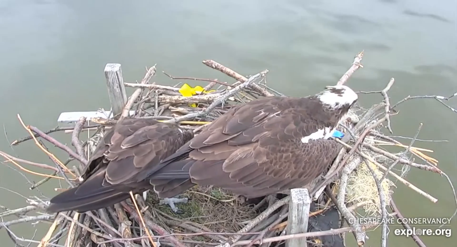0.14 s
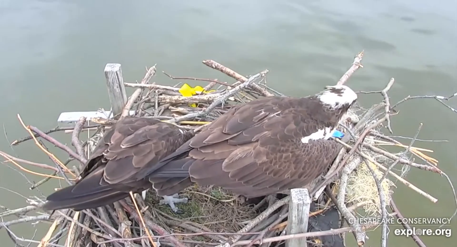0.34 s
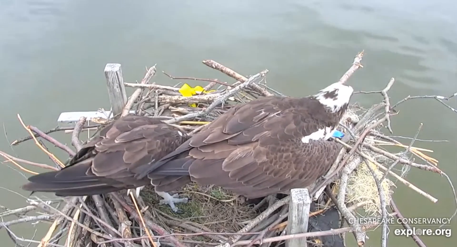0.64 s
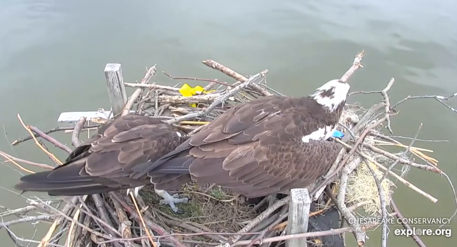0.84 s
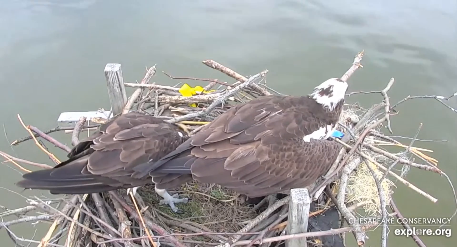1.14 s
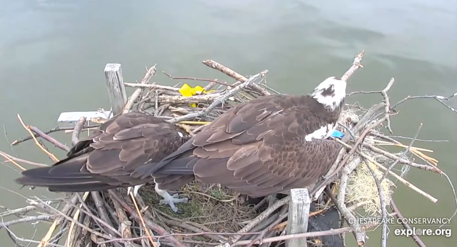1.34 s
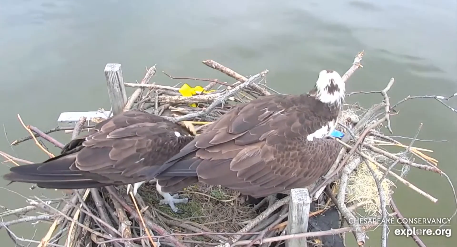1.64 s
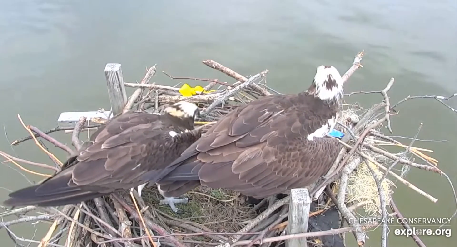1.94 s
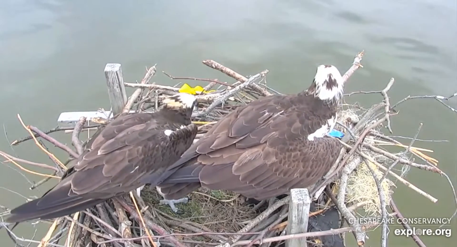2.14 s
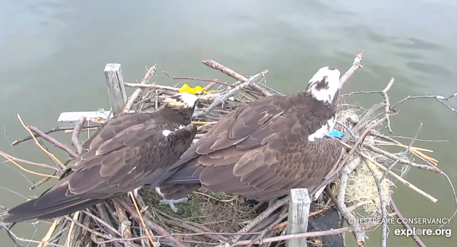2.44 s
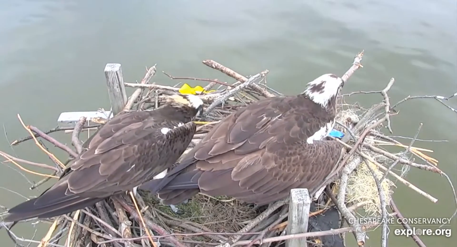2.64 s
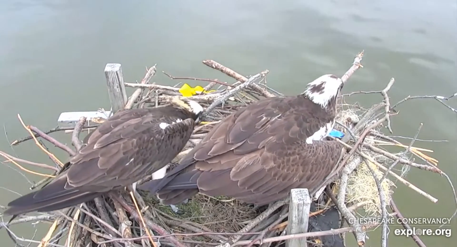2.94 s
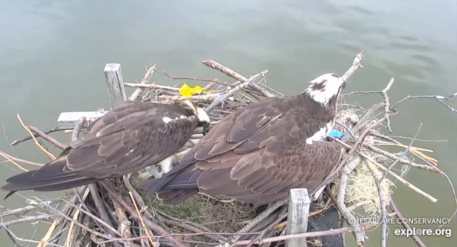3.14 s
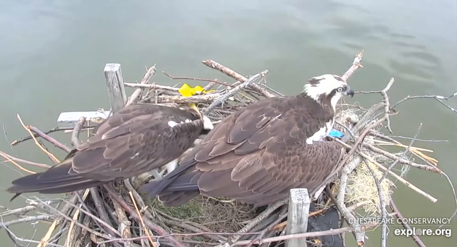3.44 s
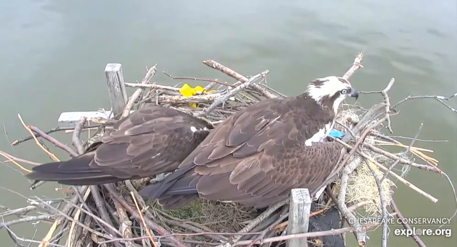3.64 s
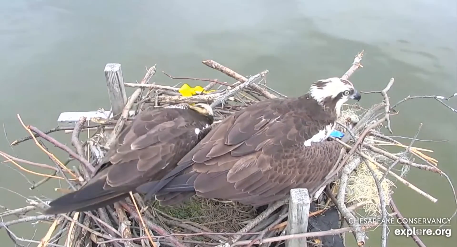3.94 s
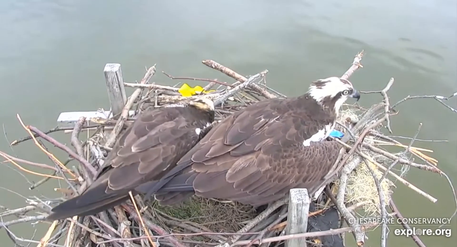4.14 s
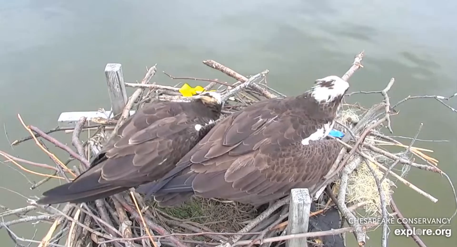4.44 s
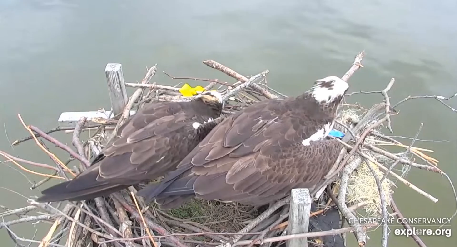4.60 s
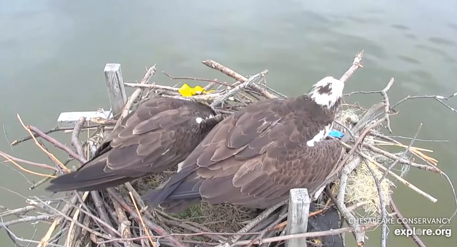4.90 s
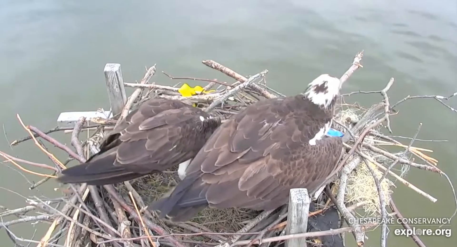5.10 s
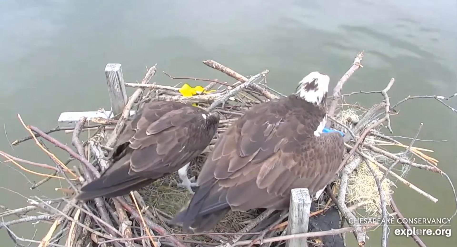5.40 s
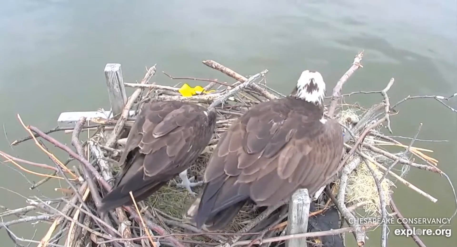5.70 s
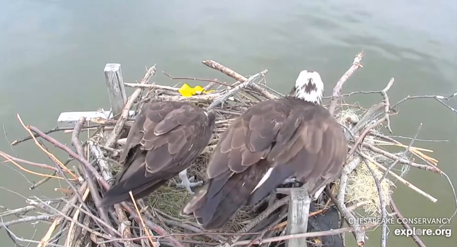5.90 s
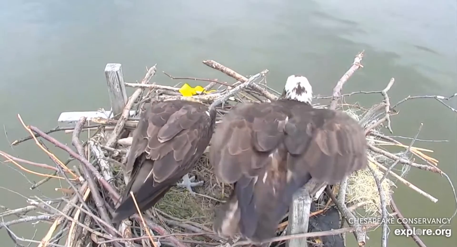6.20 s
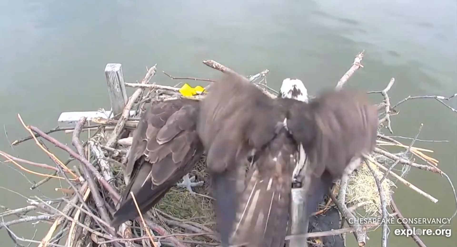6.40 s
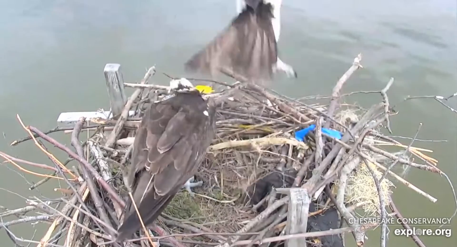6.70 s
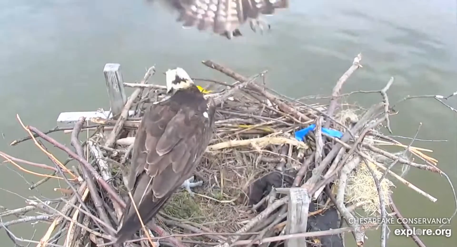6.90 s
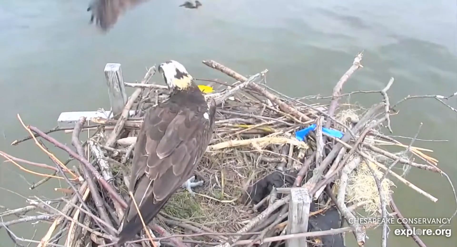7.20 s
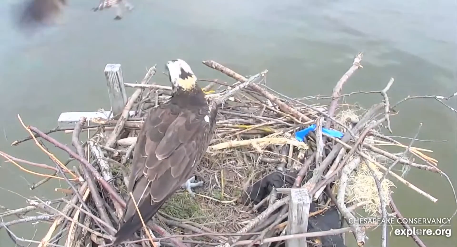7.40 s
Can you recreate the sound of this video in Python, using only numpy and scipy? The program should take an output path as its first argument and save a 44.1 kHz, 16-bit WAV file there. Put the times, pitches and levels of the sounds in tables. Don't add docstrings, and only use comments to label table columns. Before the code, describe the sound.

Quiet outdoor air over water, with faint hiss and a thin, steady distant machine hum. From about 0.4 to 1.3 seconds a nearby osprey gives four short, clear, high whistles, the first soft, the others firmer, each arching upward and ending in a quick drop. The background lifts after the calls and slowly sinks. After a rest, a longer rising whistle and a wavering answer come at 2.1 to 2.65. Another pause holds only hum and barely audible twig ticks. From 4.7 to 5.75 three longer, stronger whistles follow, the last loudest. At 5.9 the voice falters, turning breathy, and a small cracked squeak slips out near 6.3. Take-off begins at once: a crisp twig snap at 6.4, soft quick feather rustles to 6.65, then another stroke around 6.9 with pushed air, crackling sticks and a brief digital glitch. Light clicks and knocks end near 7.25, leaving faint hiss and hum.

```python
import sys
import numpy as np
from scipy import signal
from scipy.fft import rfft, irfft
from scipy.io import wavfile
from scipy.ndimage import uniform_filter1d

SR = 44100
rng = np.random.default_rng(int(sys.argv[2]) if len(sys.argv) > 2 else 0)


def pcm_store(signal):
    levels = np.round(np.clip(np.atleast_2d(signal), -1, 1) * 32767)
    wavfile.write(sys.argv[1], SR, levels.astype(np.int16).T)


def elevation(decibels):
    levels = np.asarray(decibels, float)
    return 10 ** (levels / 20)


N = 332955
T = np.arange(N) / SR

# [f/Hz, level/dB per Hz]
AIR = [(18, -70.5), (30, -39.5), (100, -12), (335, -15.5), (424, -13.5), (483, -20), (775, -17.5),
       (838, -9), (1030, -17.5), (1380, -12), (1530, -16.5), (4490, -18), (5540, -15), (6310, -20.5),
       (15800, -23.5)]
# [f/Hz, width/Hz, level/dB]
HUM = [(293, 23, -7.5), (385.8, 19, -3), (516, 5.5, -12.5), (953, 38, -1), (1370.3, 33, -1),
       (5350, 200, -2), (5760, 180, -1)]
# [f/Hz, level/dB]
WHINE = [(427, -5), (833, -9), (855, 6.5), (2137, -6.5)]
HISS_DB, CIRCUIT_DB = -66.5, -76.5
GATE_SHUT_DB, GATE_OPEN_DB, GATE_DEPTH_DB, GATE_RELEASE_S = -50.5, -27, -21, 1

# [t/s, length/s, depth/dB, held tones level/dB]
DROPS = [(.708, .012, -16, 0), (2.223, .011, -9, 0), (2.732, .013, -14, 0), (3.031, .017, -13, 0),
         (4.213, .02, -8, 0), (5.844, .013, -16, 0), (6.029, .012, -10, 0), (6.924, .102, -6, -40),
         (6.929, .039, -8, -40), (6.948, .02, -12, -8), (6.986, .027, -9, -40)]
HELD_TONES, HELD_DB, HELD_FADE_DB_PER_S = 14, 1, 160
HELD_TILT_DB = 2.5

# [t/s, peak level/dB, f/Hz, ring/s, width as share of f]
TWIGS = [(3.28, -51, 1490, 0.031, 0.94), (4.185, -58.5, 3000, 0.032, 1.05), (4.485, -57, 4500, .01, 1.05),
         (6.408, -31, 3970, 0.026, 1.1), (6.433, -52, 8760, 0.0081, 1.05), (6.603, -50, 3000, 0.0072, 1.05),
         (6.862, -52, 4500, .005, 1.05), (6.918, -34.5, 11300, 0.014, .9), (6.978, -43, 5860, 0.018, 0.79),
         (7.14, -48, 8000, .004, 1.3), (7.242, -39, 5000, .005, 1.1), (7.242, -39.5, 12500, 0.03, .6),
         (7.245, -40, 11700, .025, 0.51), (7.249, -45, 12500, .025, .6)]
# [t/s, peak level/dB, ring/s]
KNOCKS = [
    (6.862, -45, 0.025),
    (7.14, -37.5, 0.0068),
    (7.242, -37, 0.0091),
]

# [t/s, feather rustle level/dB, air push level/dB]
STROKES = [(6.37, -54, -79), (6.445, -48.5, -71), (6.572, -48, -74), (6.59, -47.5, -74),
           (6.616, -46.5, -68), (6.636, -48, -69), (6.866, -64, -68), (6.9, -55, -65), (6.922, -53, -55),
           (7.04, -60, -63), (7.154, -56.5, -66.5), (7.24, -66, -61.5)]
SPREAD_S, RUSTLE_DB, RUSTLE_FADE_DB_PER_S, PUSH_DB = 6.335, -55.5, 9, -83
RUSTLE_RISE_DB_PER_S, RUSTLE_FALL_DB_PER_S, PUSH_RISE_DB_PER_S, PUSH_FALL_DB_PER_S = 224, 400, 700, 150
RUSTLE_PEAK_HZ, RUSTLE_PEAK_DB, RUSTLE_TOP_HZ = 7000, -7, 9430

# [delay t/s, level/dB]
ECHOES = [(.0045, -25), (.012, -27), (.0215, -19), (.033, -36.5), (.043, -36.5), (.058, -42)]

# [t/s, length/s, start f/Hz, end f/Hz, top level/dB]
LEAD_INS = [(0.424, 0.097, 1656, 2080, -48.5), (0.667, 0.019, 1984, 2070, -32.5),
            (2.105, 0.016, 1790, 1860, -58), (4.69, 0.027, 1740, 1890, -56),
            (5.141, 0.013, 1990, 2270, -50), (5.527, 0.022, 2080, 2160, -36),
            (5.887, 0.012, 1990, 2220, -44.5)]
LEAD_RISE_DB_PER_S, LEAD_TOP_SHARE, LEAD_END_DB, LEAD_OCTAVE_DB = 300.5, .75, -2.5, -20.5
# [t/s, length/s, start f/Hz, top level/dB]
TAILS = [(0.596, 0.037, 1880, -34), (0.807, 0.02, 2050, -43.5), (1.06, 0.016, 2044, -38),
         (1.302, 0.027, 2065, -35.5), (2.359, 0.022, 2000, -37), (5.021, 0.025, 2020, -35.5),
         (5.377, 0.025, 2094, -37), (5.751, 0.024, 2060, -48), (6.081, 0.027, 2030, -41.5)]
TAIL_RISE_DB, TAIL_TOP_SHARE, TAIL_END_DB, TAIL_FALL_HZ, TAIL_OCTAVE_DB = -8, 0.45, -22, 342, -11.5
LEAD_OCTAVE_FOLLOWS, TAIL_OCTAVE_FOLLOWS = .15, .9
TWELFTH_DB = -11.5

# [f/Hz, width/Hz, level/dB]
BREATH = [(95, 65, -8.5), (331.7, 160, -9), (1240, 510, -3.5), (2400, 640, 11.5), (3750, 680, 1.5),
          (4260, 560, -3.5), (5500, 390, -0.5), (6880, 1400, -2.5), (9200, 1900, -15.5)]
PUFF_DB, PUFF_S = -65, 0.069
CHEST = [-48, -50.5, -48.5, -47, -53.5, -48, -57, -40, -48.5, -48, -46, -44, -46, -44]

# [pitch ratio, level/dB over strain at start, first third, second third, end]
SECOND_VOICE = [(.775, -8, -6, -6, -5.5), (.78, -4, 2, 2, 3), (.78, -12, 0.5, 2, 3.5),
                (.77, -12, 0, 3, 7.5), (.785, -6, 0, 4.5, -0.5), (.8, -4, 3.5, 4, 6), (.77, 4, -4, -1, 7),
                (0.73, -7, -9, -17, -9), (.81, -2, 8, 8, 10), (0.99, -12, -4, -1, 0.5),
                (.81, -16, -8, -8, -6), (.78, -6, -2, -.5, -2), (.78, -8, 5, 1, -4),
                (0.67, -10, -3, 2, -.5)]
SUM_TONES = [(-2, 0, -2, -2), (-2, -2, -2, -2), (-2, -2, -2, -2), (-2, -2, -2, -2), (9, 0, -2, 2),
             (-2, -5, -5, -1.5), (15, 4, -3, 6), (3, -3, -3, 2.5), (-3, -8, -5, -6), (.5, -2, 3, -0.5),
             (-2, -2, -2, -2), (-2, -2, -2, -2), (-2, -2, -2, -2), (-2, -2, -2, -2)]
SUM_SHARES = [0, .14, .5, 1]
FLUTTER_DB, FLUTTER_BURST_DB = 3.5, 3
RASP_DB, SIDEBANDS_DB = 4, -2

# [level/dB over strain: half at start, half at end, 2.5 x at start, middle, end]
SIDE_LINES = [(-4, -7, -19, -17, -14.5), (-2, -4, -0.5, -9, -11), (-13, -7.5, -9.5, -9, -7.5),
              (-10, -10, -10.5, -11, -10), (1.5, -14, -4.5, -4, -4), (-6, -6.5, -14.5, -4.5, 3),
              (1.5, -9, 3, -4.5, -3.5), (-3, -4, -8, -1.5, 4), (-12, 2, -6, -12, -1.5),
              (-8, 5, -13, -21, -22), (-15, -15, -13, -15, -15), (-19, -15, -15, -15, -15),
              (-10, -12, -12, -12, -12), (-24, -24, -24, -24, -24)]
# [level/dB over strain at start, first third, second third, end]
FIFTHS = [(-19, -20, -19, -14.5), (-7, -8, -12, -7), (-10, -10, -6, -4), (-7, -4, -1.5, 2),
          (1, -3.5, -8, -11.5), (-8, -5, 13, 4.5), (-9, -6, -8, -1), (-9, -4, -2, -8), (0.5, 14, 9, 4),
          (-13, -3, -16, -22), (-15, -15, -15, -15), (-15, -15, -15, -15), (-10, -10, -10, -10),
          (-22, -22, -24, -24)]
SIDE_START_DB, SIDE_START_S, SLACK_DB_PER_HZ = -12, 0.025, 0.1

# [f/Hz, level/dB under the tone]
SECOND_PARTIAL = [(4800, -27), (5080, -15), (5260, -9.5), (5480, -19), (5620, -24), (5850, -20.5),
                  (7200, -12), (7800, -6)]
# [f/Hz, level/dB under the tone]
THIRD_PARTIAL = [(7000, -32), (7600, -23.5), (7900, -22.5), (8200, -27.5), (8600, -38.5), (10500, -56)]
SECOND_SHIFTS = [(5.5, 8.5, 10.5, 8.5, 8), (1.5, 3.5, -1, 2, 3), (2, -0.5, -9, 1, 3.5),
                 (0.5, -1, .5, -2.5, -3.5), (-2, -13.5, -2.5, 2, 0), (-7.5, -1.5, 7.5, 0.5, -1),
                 (6.5, 7.5, -.5, 5.5, -13), (-10, 3, 1.5, 4, -7.5), (-8, -6.5, -8.5, -6.5, -8),
                 (11.5, -3, 5, 10.5, 21), (8, 4, 1.5, -4, -3), (.5, .5, -1, -4, -5),
                 (-26, -26, -17, -2, -1), (12, 11.5, 5.5, -12, -17)]
THIRD_SHIFTS = [(3, 0, 2.5, 6.5, 18), (-4, -7, -5, -5.5, -5), (-2.5, -2, -3, -4, -3),
                (-2.5, -3, 0.5, -4.5, -2), (8, -2.5, 0, -.5, 2.5), (-1, -9, -2.5, -1, -1.5),
                (16.5, 6.5, 2.5, 1.5, 9), (4, 3, -4, 1.5, 4), (-2, -0.5, -2.5, -2.5, -5), (3, 3, 2, -5, -2),
                (2, 3, -1, -3, .5), (9, 9, 9, 9, 9), (-14, -14, -14, -14, -14), (11, 7, 11.5, 16, 9)]
POSTURE_SHARES = [0, .14, .5, .84, 1]
TONE_SHIMMER_DB = .45

# [t/s, f/Hz, level/dB, strain/dB: breath under the tone]
FIRST_SERIES = [
    [(0.5, 2523, -50, -31), (0.51, 2517, -36, -30.5), (0.538, 2538, -23, -25.5), (0.572, 2480, -22, -28.5),
     (0.59, 2366, -28, -31.5), (0.6, 2270, -35, -40)],
    [(0.685, 2554, -29, -33), (0.692, 2613, -23.5, -28.5), (0.72, 2722, -21.5, -33),
     (0.772, 2725, -21, -33), (0.798, 2595, -20.5, -34.5), (0.81, 2440, -28, -36.5)],
    [(0.938, 2607, -35.5, -32), (0.946, 2670, -27.5, -35.5), (0.974, 2804, -21.5, -38.5),
     (1.014, 2803, -20, -33.5), (1.036, 2722, -20.5, -30), (1.052, 2580, -22, -32.5),
     (1.06, 2473, -31, -46.5)],
    [(1.193, 2585, -42.5, -33.5), (1.201, 2633, -29.5, -34), (1.215, 2760, -23, -33.5),
     (1.237, 2830, -19, -33.5), (1.269, 2804, -18.5, -32), (1.287, 2708, -19, -33.5),
     (1.305, 2477, -28, -34)],
]
# [t/s, f/Hz, level/dB, strain/dB]
SECOND_SERIES = [
    [(2.101, 2315, -45, -35), (2.114, 2465, -40.5, -37.5), (2.15, 2532, -22, -33.5),
     (2.19, 2641, -21.5, -35), (2.24, 2691, -22.5, -30), (2.302, 2788, -19.5, -30.5),
     (2.326, 2722, -20.5, -31), (2.348, 2570, -24, -32.5), (2.36, 2386, -29.5, -30)],
    [(2.462, 2624, -40, -32), (2.469, 2674, -32, -33.5), (2.483, 2820, -26, -30.5), (2.507, 2876, -23, -33),
     (2.551, 2808, -24, -28), (2.593, 2856, -21.5, -31), (2.621, 2760, -20.5, -31.5),
     (2.641, 2565, -24, -36.5), (2.649, 2400, -26.5, -32)],
]
# [t/s, f/Hz, level/dB, strain/dB]
THIRD_SERIES = [
    [(4.712, 2355, -56.5, -36), (4.726, 2508, -48, -33), (4.766, 2579, -26, -28),
     (4.822, 2596, -22.5, -28.5), (4.956, 2836, -20, -31), (4.992, 2749, -20.5, -30),
     (5.01, 2634, -22.5, -31), (5.022, 2460, -28.5, -35)],
    [(5.145, 2540, -45, -38), (5.151, 2700, -37, -34), (5.167, 2843, -26.5, -28.5),
     (5.183, 2932, -23.5, -30.5), (5.251, 2868, -25.5, -27), (5.321, 2980, -26.5, -31.5),
     (5.345, 2920, -23.5, -29), (5.365, 2707, -19.5, -30), (5.377, 2550, -31, -37)],
    [(5.527, 2290, -63, -26.5), (5.535, 2686, -34, -31.5), (5.549, 2845, -21.5, -33),
     (5.571, 2936, -17, -37.5), (5.643, 2860, -19.5, -33.5), (5.707, 2943, -17.5, -39.5),
     (5.727, 2860, -17.5, -30.5), (5.741, 2730, -25, -34), (5.748, 2510, -28.5, -24)],
]
# [t/s, f/Hz, level/dB, strain/dB]
LAST_CALLS = [
    [(5.889, 2494, -47.5, -24), (5.9, 2686, -38.5, -15), (5.919, 2870, -22.5, -29),
     (5.935, 2858, -19.5, -29.5), (5.961, 2845, -21.5, -27), (5.975, 2788, -28.5, -19.5),
     (6.011, 2790, -32, -16), (6.029, 2827, -27.5, -22.5), (6.047, 2830, -32.5, -10.5)],
    [(6.056, 2760, -35, -7), (6.065, 2700, -30.5, -17), (6.075, 2630, -26, -27), (6.082, 2520, -27.5, -29)],
    [(6.226, 2630, -44, -21), (6.236, 2840, -44.5, -20), (6.241, 2930, -48, -20)],
    [(6.238, 3690, -45, -18), (6.274, 3950, -43, -26), (6.302, 3670, -33.5, -22), (6.316, 3500, -49, -21)],
    [(6.314, 2657, -40, -16), (6.328, 2620, -34, -20), (6.344, 2330, -32, -26)],
]
CLOSE_S, CLOSE_FALL_HZ, CLOSE_DB = 0.0076, 90, -15


def at_hz(points, hz):
    points_hz, points_db = np.transpose(points)
    return np.interp(np.log(hz), np.log(points_hz), points_db)


def along(points, size, shares=None):
    if shares is None:
        shares = np.linspace(0, 1, len(points))
    return np.interp(np.linspace(0, 1, size), shares, points)


def rms_one(x):
    return x / np.sqrt(np.mean(x ** 2) + 1e-20)


def drift(rate_hz, size=N):
    r = np.exp(-2 * np.pi * rate_hz / SR)
    return rms_one(signal.lfilter([1], [1, -2 * r, r * r], rng.standard_normal(size + 4000))[4000:])


def resonance(x, hz, width_hz):
    r = np.exp(-np.pi * width_hz / SR)
    poles = [1, -2 * r * np.cos(2 * np.pi * hz / SR), r * r]
    return signal.lfilter([(1 - r * r) / 2, 0, (r * r - 1) / 2], poles, x)


def twice(x, hz, width_hz):
    return resonance(resonance(x, hz, width_hz), hz, width_hz)


def filtered(x, design):
    return signal.sosfilt(design, x)


def note(rows):
    s, *columns = np.transpose(rows)
    where = slice(int(s[0] * SR), int(s[-1] * SR))
    t = T[where]
    fade = np.clip(np.minimum(t - s[0], s[-1] - t) / 0.002, 0, 1)
    hz, *levels = [uniform_filter1d(np.interp(t, s, c), size=90, mode="nearest") for c in columns]
    return where, fade, [uniform_filter1d(hz, size=500, mode="nearest"), *levels]


def partial(phase, db, shimmer_db):
    return np.sqrt(2) * elevation(db + shimmer_db * drift(90, size=len(phase))) * np.sin(phase)


def background():
    hz = np.maximum(np.arange(N // 2 + 1) * SR / N, 15)
    air = irfft(rfft(rng.standard_normal(N)) * elevation(at_hz(AIR, hz)), N)
    top = filtered(air, signal.butter(4, [11500, 15500], "band", fs=SR, output="sos"))
    white = rng.standard_normal(N + SR)
    hum = sum(elevation(db) * rms_one(twice(white, f, width)[SR:]) for f, width, db in HUM)
    whine = np.zeros(N)
    for f, db in WHINE:
        whine += np.sqrt(2) * elevation(db + 2 * drift(9.3)) * np.sin(2 * np.pi * f * T + 1.1 * drift(2.9))
    return elevation(HISS_DB + 0.64 * drift(5.2)) * (air / top.std() + hum + whine)


def gate(near):
    level_db = 10 * np.log10(np.maximum(uniform_filter1d(near ** 2, size=900), 1e-12))
    wanted = np.clip((level_db - GATE_SHUT_DB) / (GATE_OPEN_DB - GATE_SHUT_DB), 0, 1)
    held = np.maximum.accumulate(wanted * np.exp(T / GATE_RELEASE_S)) * np.exp(-T / GATE_RELEASE_S)
    r = np.exp(-1 / (.012 * SR))
    return elevation(GATE_DEPTH_DB * (1 - signal.lfilter([1 - r], [1, -r], held)))


def dropouts(x):
    dip_db = sum(db * ((T > s) & (T < s + length)) for s, length, db, _ in DROPS)
    dip = elevation(uniform_filter1d(dip_db, size=200))
    held = np.zeros(N)
    for s, length, _, held_db in DROPS:
        first = int(s * SR) - 1124
        lines = rfft(x[first:first + 1024] * np.hanning(1024))[:260] / 256
        tops = signal.find_peaks(np.abs(lines))[0]
        weight = np.abs(lines[tops]) * elevation(HELD_TILT_DB * tops / len(lines))
        tops = tops[np.argsort(-weight)[:HELD_TONES]]
        steps = np.arange(1424 + int(length * SR))
        fading = elevation(held_db - HELD_FADE_DB_PER_S * np.maximum(steps - 1124, 0) / SR)
        tones = np.real(lines[tops] @ np.exp(2j * np.pi * np.outer(tops, steps) / 1024))
        held[first + 900:first + len(steps)] += (fading * tones)[900:]
    return dip * x + np.sqrt(1 - dip ** 2) * elevation(HELD_DB) * held


def twig_snaps():
    out, t = np.zeros(N), T[:2000]
    for s, db, hz, ring, share in TWIGS:
        burst = rng.standard_normal(2000) * elevation(-60 * t / ring)
        snap = twice(burst, hz, share * hz)
        out[round(s * SR):round(s * SR) + 2000] += elevation(db) * snap / np.abs(snap).max()
    return out


def stick_knocks():
    out, t = np.zeros(N), T[:2000]
    sweep = np.sin(2 * np.pi * 1.81 * np.log(1 + t / 0.000363)) * np.clip(t / 0.00034, 0, 1)
    for s, db, ring in KNOCKS:
        out[round(s * SR):round(s * SR) + 2000] += elevation(db - 25 * t / ring) * sweep
    return out


def strokes(bed_db, peaks_db, rise_db_per_s, fall_db_per_s):
    levels = [bed_db + 0 * T]
    for (s, *_), db in zip(STROKES, peaks_db):
        levels.append(db - np.maximum(rise_db_per_s * (s - T), fall_db_per_s * (T - s)))
    return elevation(np.max(levels, axis=0)) * (T > SPREAD_S)


def feather_rustle():
    _, rustle_db, _ = np.transpose(STROKES)
    grains = rng.standard_normal(N) * elevation(1.6 * drift(150))
    grains = grains + elevation(RUSTLE_PEAK_DB) * resonance(grains, RUSTLE_PEAK_HZ, 3000)
    grains = filtered(grains, signal.butter(2, 1100, "high", fs=SR, output="sos"))
    grains = filtered(grains, signal.cheby2(10, 40, RUSTLE_TOP_HZ, fs=SR, output="sos"))
    bed_db = RUSTLE_DB - RUSTLE_FADE_DB_PER_S * (T - SPREAD_S)
    gain = strokes(bed_db, rustle_db, RUSTLE_RISE_DB_PER_S, RUSTLE_FALL_DB_PER_S)
    return elevation(-2) * rms_one(grains) * gain


def air_push():
    _, _, push_db = np.transpose(STROKES)
    lumps = rng.standard_normal(N) * elevation(2.7 * drift(20))
    low = filtered(lumps, signal.butter(2, [50, 220], "band", fs=SR, output="sos"))
    return rms_one(low) * strokes(PUSH_DB, push_db, PUSH_RISE_DB_PER_S, PUSH_FALL_DB_PER_S)


def nest(x):
    bright = x + elevation(10.5) * twice(x, 5500, 2000)
    return x + sum(elevation(db) * np.interp(T - late, T, bright) for late, db in ECHOES)


def puffs(voice):
    level = uniform_filter1d(np.abs(voice), size=600)
    r = np.exp(-1 / (PUFF_S * SR))
    rising = np.maximum(level - signal.lfilter([1 - r], [1, -r], level), 0)
    low = filtered(rng.standard_normal(N), signal.butter(2, [45, 330], "band", fs=SR, output="sos"))
    return elevation(PUFF_DB) * rising / 0.063 * rms_one(low)


def grumble(effort):
    low = rng.standard_normal(N) * elevation(3.5 * drift(25))
    return effort * rms_one(twice(low, 280, 260))


def breath(airflow, white):
    hiss = np.zeros(N)
    for k, (hz, width, db) in enumerate(BREATH):
        hiss += (-1) ** k * elevation(db) * twice(white, hz, width)
    unsteady = elevation(8.5 + .8 * drift(60) + 1.8 * drift(14))
    return uniform_filter1d(airflow, size=500) * unsteady * rms_one(hiss)


def register_breaks():
    notes = []
    for s, length, from_hz, to_hz, db in LEAD_INS:
        rise_db = -LEAD_RISE_DB_PER_S * LEAD_TOP_SHARE * length
        notes.append((s, length, from_hz, to_hz, db, rise_db,
                      LEAD_TOP_SHARE, LEAD_END_DB, LEAD_OCTAVE_DB, LEAD_OCTAVE_FOLLOWS))
    for s, length, hz, db in TAILS:
        notes.append((s, length, hz, hz - TAIL_FALL_HZ, db, TAIL_RISE_DB,
                      TAIL_TOP_SHARE, TAIL_END_DB, TAIL_OCTAVE_DB, TAIL_OCTAVE_FOLLOWS))
    out = np.zeros(N)
    for s, length, from_hz, to_hz, top_db, rise_db, share, end_db, octave_db, follows in notes:
        start = (s, from_hz, top_db + rise_db)
        top = (s + share * length, from_hz + share * (to_hz - from_hz), top_db)
        end = (s + length, to_hz, top_db + end_db)
        where, fade, (hz, db) = note([start, top, end])
        phase = 2 * np.pi * np.cumsum(hz) / SR
        upper_db = top_db + octave_db + follows * (db - top_db)
        tone = partial(phase, db, 0.4) + partial(2 * phase, upper_db, 1.3)
        out[where] += fade * (tone + partial(3 * phase, upper_db + TWELFTH_DB, 2.5))
    return out


def second_voice(hz, phase, rasp_db, ratio, sum_db):
    size = len(hz)
    low = 2 * np.pi * np.cumsum(ratio * hz * (1 + .011 * drift(45, size=size))) / SR
    bursts_db = RASP_DB + FLUTTER_BURST_DB * drift(19, size=size)
    mixes = [(low, 3), (2 * low, sum_db - 10), (2 * phase - low, -12), (phase + low, sum_db - 10.5),
             (3 * phase - low, -17), (2 * phase + low, sum_db - 14.5)]
    out = np.zeros(size)
    for mix, mix_db in mixes:
        out += partial(mix, rasp_db + mix_db + bursts_db + 1.5 * drift(25, size=size), FLUTTER_DB)
    return out


def shaken_air(phase, breath_db, ripple):
    lines = [(1, 8), (1.5, -6), (2, -8.5), (2.5, -5), (3, -12)]   # (multiple of pitch, dB)
    bands = sum(elevation(db) * np.sin(order * phase) for order, db in lines)
    return elevation(breath_db + SIDEBANDS_DB + 1.8 * drift(30, size=len(phase))) * ripple * bands


def side_lines(phase, half_db, fifth_db, upper_db):
    size = len(phase)
    slip = .2 * drift(30, size=size)
    out = np.zeros(size)
    for order, db in [(.5, half_db + 2.5), (1.5, fifth_db + 2.5), (2.5, upper_db), (3.5, upper_db - 11.5)]:
        out += partial(order * phase + slip, db + 2.5 * drift(12, size=size), 1.5)
    return out


def whistles():
    voice, rasp, airflow, effort = np.zeros((4, N))
    white = rng.standard_normal(N)
    ripple = rms_one(twice(white, 420, 120))
    calls = FIRST_SERIES + SECOND_SERIES + THIRD_SERIES + LAST_CALLS
    settings = zip(calls, SECOND_SHIFTS, THIRD_SHIFTS, SIDE_LINES, FIFTHS, SECOND_VOICE, SUM_TONES, CHEST)
    for rows, beak, third, sides, fifth, second, sums, chest_db in settings:
        closing = np.add(rows[-1], (CLOSE_S, -CLOSE_FALL_HZ, CLOSE_DB, 0))
        where, fade, (hz, db, strain_db) = note([*rows, closing])
        size = len(hz)
        phase = 2 * np.pi * np.cumsum(hz * (1 + .0015 * drift(120, size=size))) / SR
        second_db = db + at_hz(SECOND_PARTIAL, 2 * hz) + along(beak, size, POSTURE_SHARES)
        third_db = db + at_hz(THIRD_PARTIAL, 3 * hz) + along(third, size, POSTURE_SHARES)
        tone = partial(phase, db, TONE_SHIMMER_DB)
        tone += partial(2 * phase, second_db, 1.5) + partial(3 * phase, third_db, 2.9)

        side_db = db + strain_db - SLACK_DB_PER_HZ * (np.maximum.accumulate(hz) - hz)
        late_db = side_db + SIDE_START_DB * np.exp(-T[:size] / SIDE_START_S)
        half_db, fifth_db, upper_db = [late_db + along(p, size) for p in (sides[:2], fifth, sides[2:])]
        voice[where] += fade * (tone + side_lines(phase, half_db, fifth_db, upper_db))

        rasp_db = side_db + along(second[1:], size)
        sum_db = along(sums, size, SUM_SHARES)
        breath_db = db + np.minimum(strain_db, -20)
        rasp[where] += fade * second_voice(hz, phase, rasp_db, second[0], sum_db)
        rasp[where] += fade * shaken_air(phase, breath_db, ripple[where])
        effort[where] += fade * elevation(db + chest_db)
        airflow[where] += fade * elevation(breath_db)
    return voice, rasp + breath(airflow, white) + puffs(voice) + grumble(effort)


def scene():
    tone, noisy = whistles()
    tone = nest(tone + register_breaks())
    rustle, push = feather_rustle(), air_push()
    snaps = twig_snaps() + stick_knocks()
    near = tone + elevation(25) * rustle + elevation(41.5) * push + elevation(19) * snaps
    far = gate(near) * background() + elevation(CIRCUIT_DB) * rng.standard_normal(N)
    return (tone + dropouts(nest(noisy) + far + rustle) + push + snaps)[None]


def top_cut(x):
    return signal.sosfilt(signal.butter(12, 16130, fs=SR, output="sos"), x)


def record(dry):
    bent = dry + 0.1 * dry ** 2
    bent = filtered(bent, signal.cheby2(16, 60, 16250, fs=SR, output="sos"))
    finished = filtered(bent, signal.butter(3, 58, "high", fs=SR, output="sos"))
    return top_cut(finished)


dry = scene()
out = record(dry)
pcm_store(out)
```